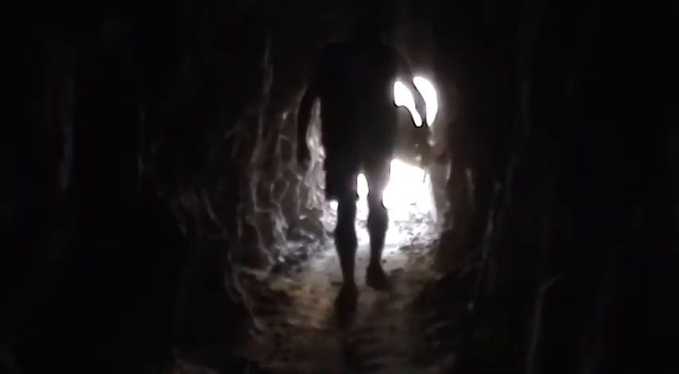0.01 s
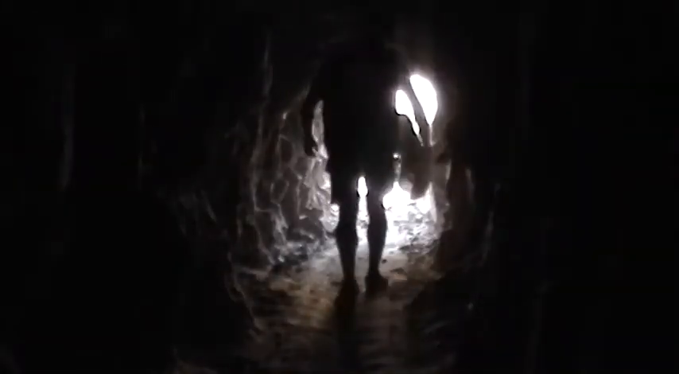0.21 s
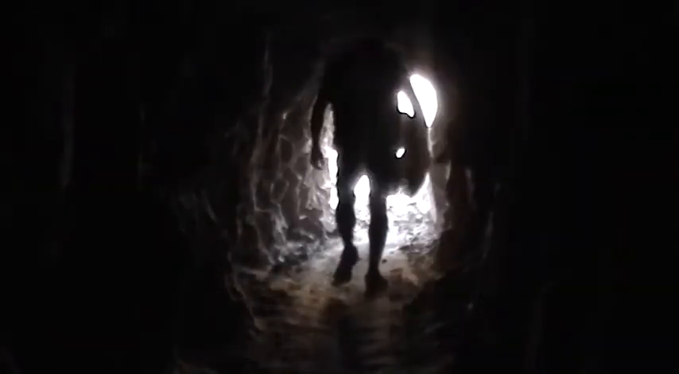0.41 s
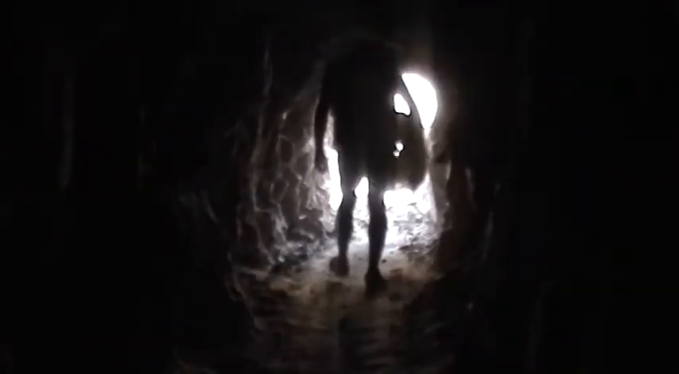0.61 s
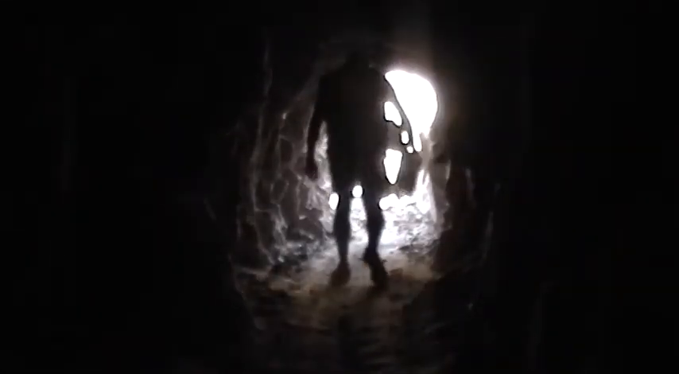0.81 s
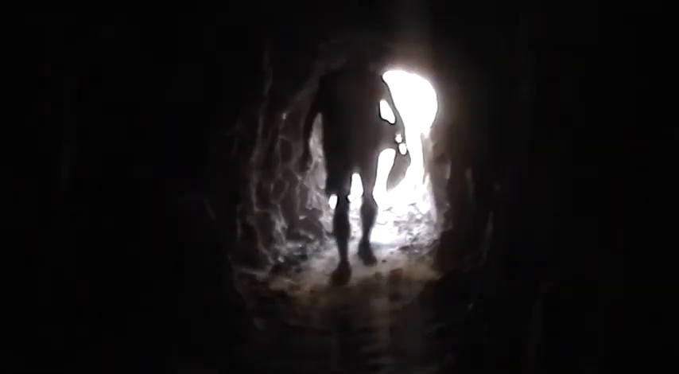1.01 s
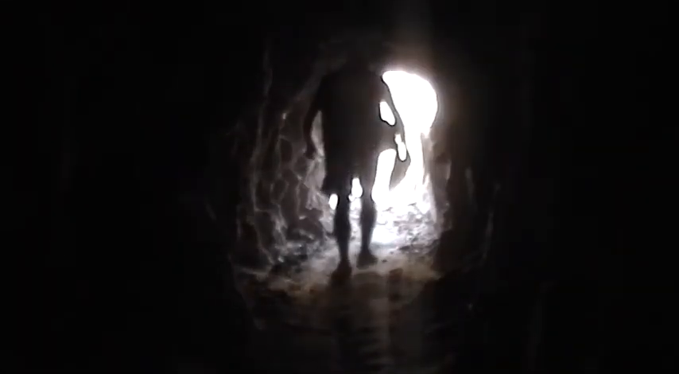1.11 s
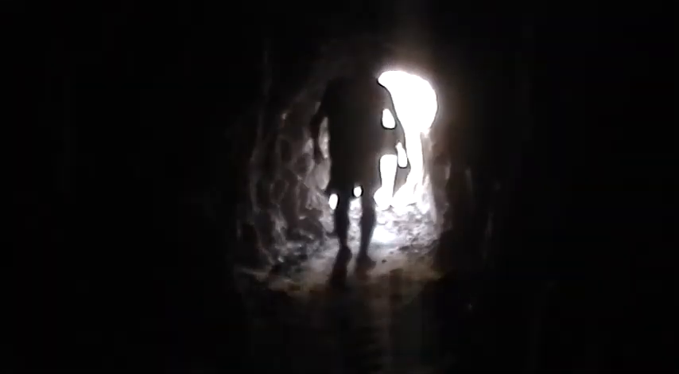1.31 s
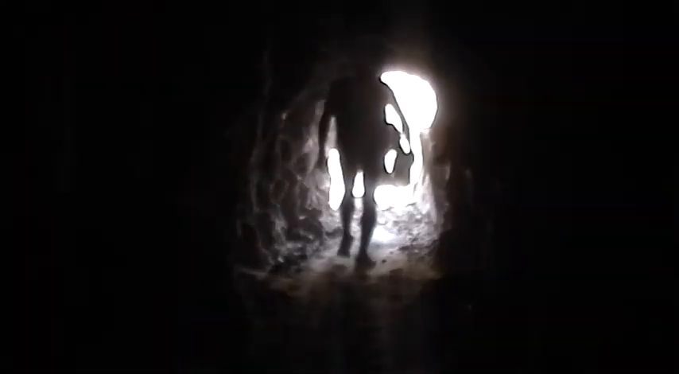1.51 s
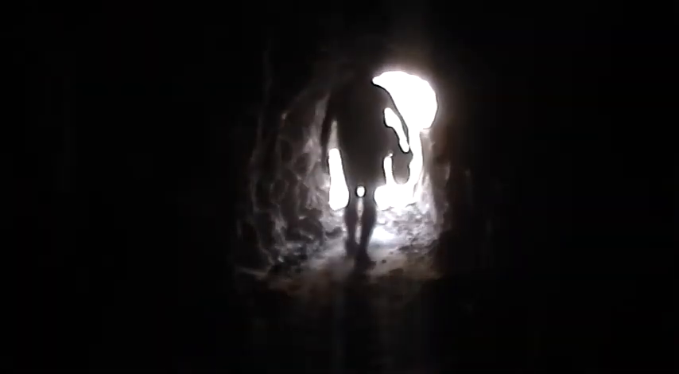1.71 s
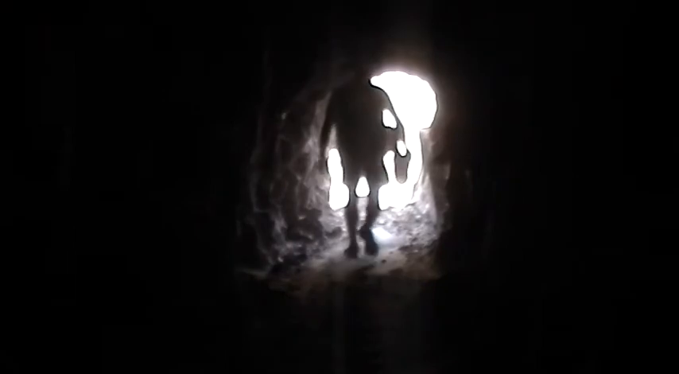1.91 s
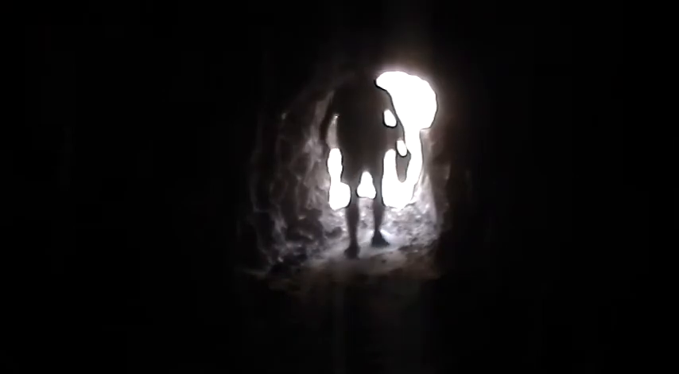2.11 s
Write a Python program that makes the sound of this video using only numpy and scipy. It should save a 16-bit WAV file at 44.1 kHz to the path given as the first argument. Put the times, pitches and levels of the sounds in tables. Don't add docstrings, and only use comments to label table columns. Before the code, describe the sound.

Shoes walking away on gritty, stony ground inside a tunnel, each step ringing off the walls

```python
import sys
import numpy as np
from scipy import signal
from scipy.fft import rfft, irfft
from scipy.io import wavfile
from scipy.ndimage import uniform_filter1d

SR = 44100
rng = np.random.default_rng(int(sys.argv[2]) if len(sys.argv) > 2 else 0)


def elevation(decibels):
    levels = np.asarray(decibels, float)
    return 10 ** (levels / 20)


def master_out(mix):
    frames = np.transpose(np.atleast_2d(mix))
    ceiling = np.clip(frames, -1, 1)
    pcm = np.round(ceiling * 32767).astype(np.int16)
    wavfile.write(sys.argv[1], SR, pcm)


N = 97020
LEAD = 13230


def unit(x):
    return x / np.sqrt(np.mean(x ** 2) + 1e-30)


def on_log(hz, table, col=1):
    table = np.array(table)
    return np.interp(np.log(hz + 1e-9), np.log(table[:, 0]), table[:, int(col)])


def band(x, hz, width_hz):
    hz = min(hz, .45 * SR)
    return signal.lfilter(*signal.iirpeak(hz, hz / width_hz, fs=SR), x)


def shaped(x, db_of):
    n = x.shape[-1]
    hz = np.arange(n // 2 + 1) * SR / n + 1
    return irfft(rfft(x) * elevation(db_of(hz)), n)


def walk(rate_hz):
    hold = int(SR / rate_hz)
    steps = np.repeat(rng.standard_normal(N // hold + 1), hold)
    return 0.22 * uniform_filter1d(uniform_filter1d(steps, hold), hold)[:N]


def add(out, x, at_s):
    i = LEAD + int(at_s * SR)
    out[i:i + len(x)] += x[:len(out) - i]


def knocks():
    # t/s, level/dB, body f/Hz, crack re body/dB
    knock_list = [(-.1, -35.5, 420, 15.5), (0.2098, -36, 1620, -6), (0.371, -35, 1490, 11),
                  (0.3726, -26, 850, -3), (0.374, -53, 1600, -8), (.378, -35, 940, -15),
                  (0.426, -53, 4000, -3), (.260, -40, 2400, -10), (0.2333, -40, 7300, 12),
                  (.555, -43, 640, -22), (.218, -36.5, 980, -14), (0.581, -46.5, 11300, -17),
                  (0.811, -36, 2630, 5.5), (.875, -43.5, 666, -23), (.887, -29.5, 13300, -31),
                  (0.9751, -31.5, 587, -23), (0.9744, -35, 14800, -30), (0.98, -37, 1610, -19),
                  (1.28, -57, 2450, 5.5), (1.303, -50.5, 450, -14), (1.3336, -45, 2530, 2),
                  (1.345, -38, 850, -15), (1.408, -36, 9000, -20), (1.4173, -31, 2030, -9),
                  (1.7318, -50, 1800, -16), (1.7939, -34, 530, -5), (1.8142, -27.5, 8650, -9),
                  (1.8142, -25.5, 12000, -19), (1.798, -39.5, 2670, 0), (1.922, -38, 2020, -3)]
    onset_s, contact_s, crack_s = .0012, .004, .0025
    crack_hz, body_width = 3500, .7
    out, t = np.zeros(N + LEAD), np.arange(2048) / SR
    for at_s, db, hz, crack_db in knock_list:
        contact = rng.standard_normal(len(t)) * (1 - np.exp(-t / onset_s))
        body = contact * np.exp(-t / contact_s)
        crack = contact * np.exp(-t / crack_s)
        for _ in range(2):
            body = band(body, hz, body_width * hz)
            crack = band(crack, crack_hz, 2 * crack_hz)
        body = body / np.abs(body).max()
        crack = crack / np.abs(crack).max()
        add(out, elevation(db) * (body + elevation(crack_db) * crack), at_s)
    return out


def stones():
    # t/s, level/dB, f/Hz, ring/s
    stone_list = [(.2105, -54, 1860, 0.0044), (.217, -50, 920, .004), (.237, -33, 1950, 0.0087),
                  (.246, -31, 3074, 0.012), (.252, -24, 1944, 0.0048), (0.254, -27, 1242, 0.0067),
                  (.263, -37, 890, .005), (.270, -29, 535, 0.0032), (.276, -31, 800, .006),
                  (0.287, -34, 1500, 0.0037), (.310, -26, 530, 0.0036), (.318, -32, 727, 0.0043),
                  (.373, -21, 605, 0.0022), (.3755, -26, 4230, 0.0032), (.378, -23, 975, 0.0062),
                  (0.383, -33, 970, 0.0014), (.395, -35.5, 423, .012), (.431, -35.5, 844, 0.0086),
                  (.440, -28.5, 595, 0.0034), (.555, -42, 645, 0.0045), (.830, -37.5, 740, 0.0075),
                  (.855, -44, 800, 0.0065), (.873, -40, 1010, 0.0053), (.884, -54, 494, 0.0035),
                  (.9748, -33, 858, 0.0054), (0.9752, -36.5, 518, 0.0045), (0.989, -45, 500, 0.0027),
                  (.991, -49, 920, .004), (.995, -48.5, 2110, 0.0091), (1.010, -37, 667, 0.0036),
                  (1.035, -52, 510, 0.0031), (1.1222, -47, 1950, .002), (1.325, -39, 835, .004),
                  (1.339, -35.5, 960, 0.0075), (1.347, -35, 1046, 0.0025), (1.352, -44, 457, 0.016),
                  (1.362, -41, 930, 0.0053), (1.395, -38, 443, 0.0047), (1.4175, -29.5, 900, .003),
                  (1.421, -28.5, 730, 0.0024), (1.423, -52, 2590, 0.0025), (1.434, -33.5, 1174, 0.0038),
                  (1.442, -27, 615, 0.0021), (1.451, -35, 670, .003), (1.472, -43.5, 396, .03),
                  (1.498, -48, 440, 0.0047), (1.796, -48, 640, 0.0036), (1.814, -40, 392, 0.006),
                  (1.823, -48, 1030, .005), (1.959, -40.5, 1647, .005)]
    rise_s = 0.00073
    out, t = np.zeros(N + LEAD), np.arange(2048) / SR
    for at_s, db, hz, ring_s in stone_list:
        envelope = (1 - np.exp(-t / rise_s)) * np.exp(-t / ring_s)
        add(out, elevation(db) * np.sin(2 * np.pi * hz * t) * envelope, at_s)
    return out


def grit(events, low_db_oct, high_db_oct):
    grains_per_s, spread_db = 7000, 2.0
    out, t = np.zeros(N + LEAD), np.arange(8192) / SR
    for at_s, rise_s, fall_s, db, hz in events:
        hit, sign, size = rng.random((3, 4, len(t)))
        impulses = (hit < grains_per_s / SR) * np.sign(sign - .5) * elevation(-spread_db * np.log(size + 0.007))
        grains = 0
        for row, size_hz in zip(impulses, (300, 1000, 3300, 11000)):
            grains = grains + shaped(row, lambda f: -6 * np.log2(f / size_hz) ** 2)
        loading = np.sin(np.pi / 2 * t / rise_s) ** 2
        unloading = np.exp(-(np.maximum(t - rise_s, 0) / fall_s) ** 1.205 * 2)
        load = np.where(t < rise_s, loading, unloading)
        slopes = lambda f: -10 * np.log10((hz / f) ** (low_db_oct / 3) + (f / hz) ** (high_db_oct / 3))
        add(out, elevation(db) * load * unit(shaped(grains, slopes)), at_s)
    return out


def crunches():
    # start t/s, rise/s, fall/s, level/dB, centre f/Hz
    crunch_list = [(.212, 0.0044, 0.027, -37.5, 980), (.234, 0.017, 0.05, -28.5, 1560),
                   (.375, 0.0019, 0.06, -36.5, 1030), (0.568, 0.017, 0.095, -58, 880),
                   (.78, 0.045, 0.0054, -45.5, 920), (.813, 0.052, 0.094, -42.5, 1090),
                   (0.979, 0.005, 0.026, -46, 810), (.45, 0.011, 0.085, -56, 730),
                   (1.0, 0.063, 0.11, -54.5, 350), (1.325, 0.019, 0.06, -37, 1490),
                   (1.418, 0.0032, 0.029, -33.5, 2140), (1.798, 0.0072, 0.13, -44, 970),
                   (1.859, 0.053, 0.12, -45.5, 2100)]
    return grit(crunch_list, low_db_oct=1, high_db_oct=5.5)


def scuffs():
    # start t/s, rise/s, fall/s, level/dB, centre f/Hz
    scuff_list = [(.234, 0.0063, 0.018, -36.5, 4500), (.98, 0.0061, 0.03, -68, 1100),
                  (1.47, 0.012, 0.057, -49, 460), (1.796, 0.019, 0.059, -47, 360),
                  (1.1, 0.0039, 0.052, -48, 4600), (1.121, 0.033, 0.025, -44.5, 2100),
                  (1.27, 0.053, 0.099, -58.5, 2500), (1.73, 0.0047, 0.052, -59, 1700),
                  (2.4, 0.045, 0.049, -62, 1800), (1.49, 0.042, 0.17, -59.5, 2540),
                  (.64, 0.059, 0.15, -64, 2600), (.34, .015, 0.038, -48.5, 3900),
                  (1.40, 0.013, 0.028, -46, 2800), (.812, 0.0052, .05, -47, 4900),
                  (1.905, 0.014, .03, -50, 3200)]
    return grit(scuff_list, low_db_oct=10, high_db_oct=9)


def footsteps():
    # f/Hz, gain/dB
    reach = [(60, -28), (170, -4), (300, 5), (1500, 3.5), (4500, 1.5), (6000, -2.5), (11000, -8.5),
             (15500, -19)]
    return shaped(knocks() + stones() + crunches() + scuffs(), lambda f: on_log(f, reach))


def thuds():
    # t/s, level/dB, f/Hz
    load_list = [(.24, -50, 106), (.375, -54.5, 99), (0.808, -47.5, 122), (0.862, -54, 60),
                 (0.871, -48.5, 127), (.985, -47, 210), (1.02, -48, 302), (.44, -47.5, 193),
                 (.50, -47.5, 331), (.83, -52, 230), (0.976, -47, 109), (1.152, -53, 113), (1.326, -54, 94),
                 (1.422, -56, 134), (1.798, -46.5, 139.7)]
    swing_s = .008
    out, t = np.zeros(N + LEAD), np.arange(8192) / SR
    for at_s, db, hz in load_list:
        envelope = t / swing_s * np.exp(1 - t / swing_s)
        add(out, elevation(db) * np.sin(2 * np.pi * hz * t) * envelope, at_s)
    return out


def chinks():
    # t/s, level/dB
    touches = [
        (1.8862, -53),
        (1.8935, -55),
        (1.900, -56),
        (1.916, -60),
    ]
    # f/Hz, t60/s, then level in each of the four touches/dB
    metal = [(7000, 0.065, -6, -3, -2, -9), (7456, 0.21, 1, -9, -9, 1), (8096, 0.1, -6, -9, -1, -6),
             (9450, .08, 1, -14, -13, -11), (9792, 0.12, 1, -1, -17, 4), (10900, 0.14, -20, 3, -6, -3),
             (11500, 0.08, -6, -8, -9, -9), (12280, .13, -20, -20, -1, -2), (13570, .06, -20, -17, -10, -9),
             (13950, 0.054, -20, -4, 4, -7), (14700, .06, -1, -6, -9, -10), (15500, .04, -9, -12, -8, -15)]
    rattle_hz, rattle_share = 160, 1.2
    out, t = np.zeros(N + LEAD), np.arange(8192) / SR
    for k, (at_s, db) in enumerate(touches):
        noise = rng.standard_normal((len(metal), len(t)))
        rattle = 1 + rattle_share * unit(uniform_filter1d(noise, int(SR / rattle_hz / 2), axis=1))
        ring = np.zeros(len(t))
        for mode, ragged in zip(metal, rattle):
            hz, t60_s, mode_db = mode[0], mode[1], mode[2 + k]
            ring += elevation(mode_db) * np.sin(2 * np.pi * hz * t) * ragged * 1000 ** (-t / t60_s)
        add(out, elevation(db) * ring, at_s)
    return out


def tunnel(dry):
    # f/Hz, t60/s, side re mid/dB
    decay = [(60, 0.35, 0), (150, 0.9, 0.5), (350, 0.71, -9.5), (800, 0.4, -6), (1800, 0.36, -6.5),
             (4170, 0.19, -12), (8300, 0.24, -26), (14300, 0.18, -0.5)]
    # f/Hz, level/dB, t60/s
    across = [(239, -60, .4), (392, -64, .4)]
    places_s = [-.3, .2, .235, .258, .28, .365, .40, .77, .84, .88, .97, 1.09, 1.26, 1.342, 1.41, 1.44, 1.7,
                1.81, 1.88, 1.91, 3]
    direct_db, echo_db, early_db = 0, -1.5, -10.5
    early_s, build_s = 0.0061, 0.013
    t = np.arange(32768) / SR
    noise = rng.standard_normal((len(places_s) - 1, 2, len(t)))
    echo = np.zeros(noise.shape)
    for hz in 40 * 2 ** np.arange(0, 9, .5):
        octaves = lambda f: np.clip(np.log2(f / hz), -.5, .5)
        part = shaped(noise, lambda f: 20 * np.log10(np.cos(np.pi * octaves(f)) + 1e-5))
        t60_s = on_log(hz, decay)
        tail = 1000 ** (-t / t60_s) * np.sqrt(14 / t60_s / SR) * elevation(echo_db)
        early = np.exp(-t / early_s) * np.sqrt(2 / early_s / SR) * elevation(early_db)
        fade = (tail + early) * (1 - np.exp(-t / build_s))
        echo += part * fade * np.array([[1], [elevation(on_log(hz, decay, col=2))]])
    for hz, db, t60_s in across:
        echo[:, 0] += elevation(db) * np.sin(2 * np.pi * hz * t) * 1000 ** (-t / t60_s)
    echo[:, 0, 0] += elevation(direct_db)
    time_s = (np.arange(len(dry)) - LEAD) / SR
    place = np.searchsorted(places_s, time_s, side="right") - 1
    parts = dry * (place == np.arange(len(echo))[:, None])
    return signal.fftconvolve(parts[:, None], echo, axes=2).sum(axis=0)[:, LEAD:LEAD + N]


def air():
    # f/Hz, level per Hz/dB
    air_mid = [(18, -35), (30, -13.5), (226, -1.5), (344, 0.5), (1940, -12), (2660, -20.5), (3540, -16),
               (4610, -22), (15800, -29.5)]
    # f/Hz, side re mid/dB
    air_side = [(60, 9), (110, 7), (200, 6), (380, -0.5), (700, -2.5), (1290, -7), (2380, -11.5),
                (4400, -14), (8120, -13), (15000, -8)]
    # f/Hz, width/Hz, level/dB
    whine = [(7270, 260, -73.5), (11900, 460, -81), (2950, 180, -80.5)]
    level_db = -56
    noise = rng.standard_normal((2, N))
    mid = shaped(noise[0], lambda f: on_log(f, air_mid))
    side = shaped(noise[1], lambda f: on_log(f, air_mid) + on_log(f, air_side))
    out = np.array([mid, side]) * elevation(level_db + 0.32 * walk(6.6)) / np.std(mid)
    for hz, width_hz, db in whine:
        out[0] += elevation(db + walk(11.0)) * unit(band(rng.standard_normal(N), hz, width_hz))
    return out


def scene():
    mid, side = tunnel(footsteps() + thuds() + chinks()) + air()
    return np.array([mid + side, mid - side])


def band_limit(x):
    return signal.sosfilt(signal.butter(12, 15830, fs=SR, output="sos"), x)


def record(dry):
    low_cut_hz, top_hz = 45, 15750
    low_cut = signal.butter(2, low_cut_hz, "high", fs=SR, output="sos")
    top_cut = signal.ellip(8, .2, 70, top_hz, fs=SR, output="sos")
    mix = signal.sosfilt(top_cut, signal.sosfilt(low_cut, dry))
    return band_limit(mix)


dry = scene()
out = record(dry)
master_out(out)
```